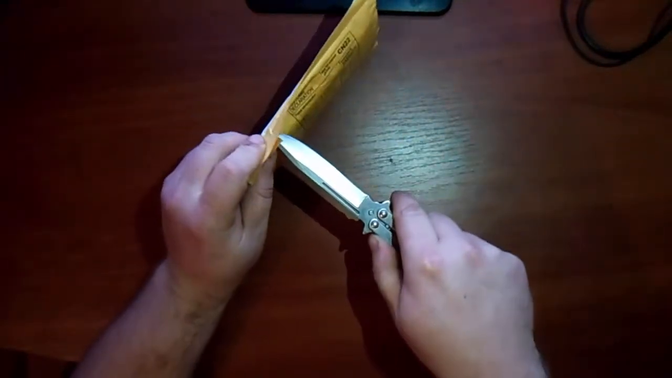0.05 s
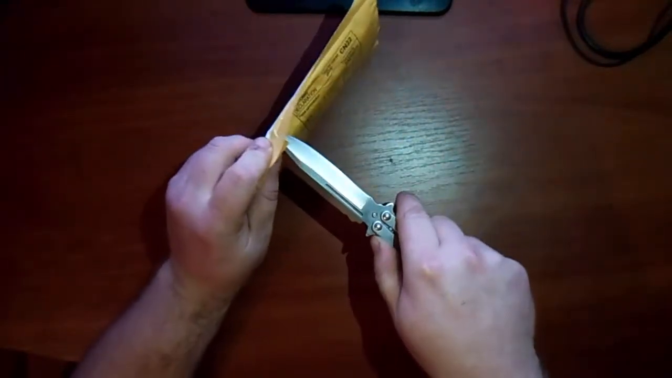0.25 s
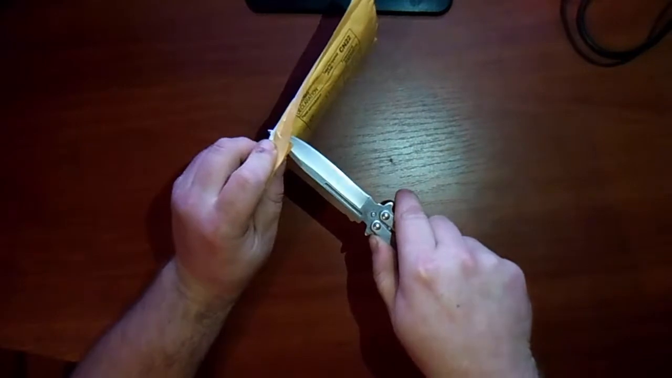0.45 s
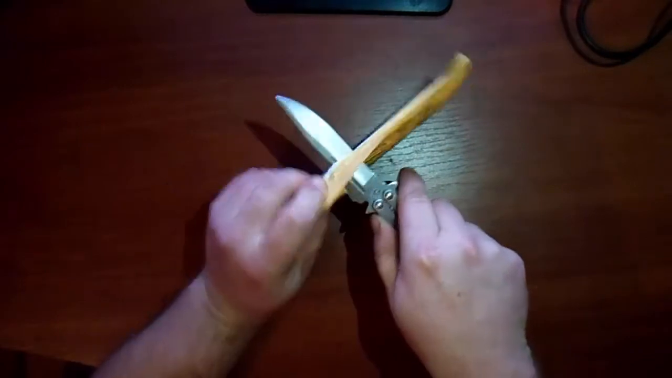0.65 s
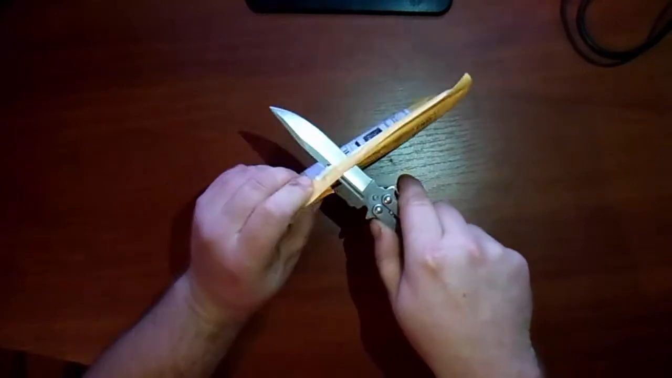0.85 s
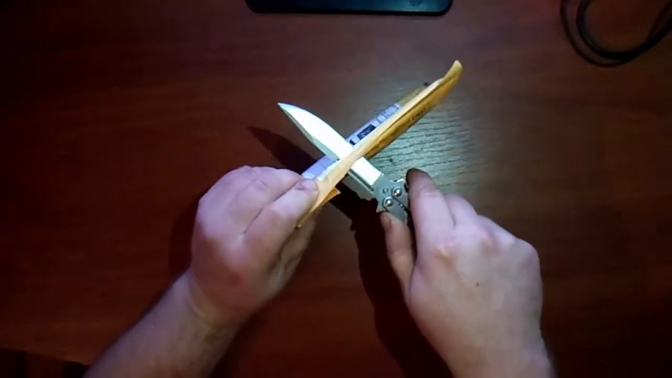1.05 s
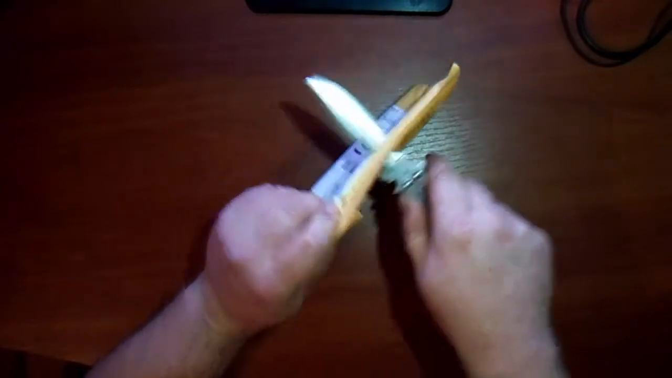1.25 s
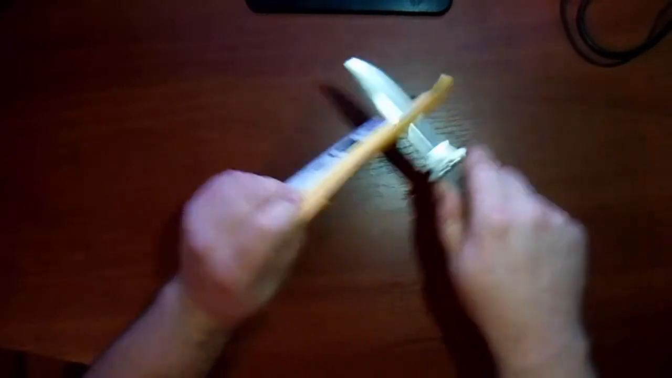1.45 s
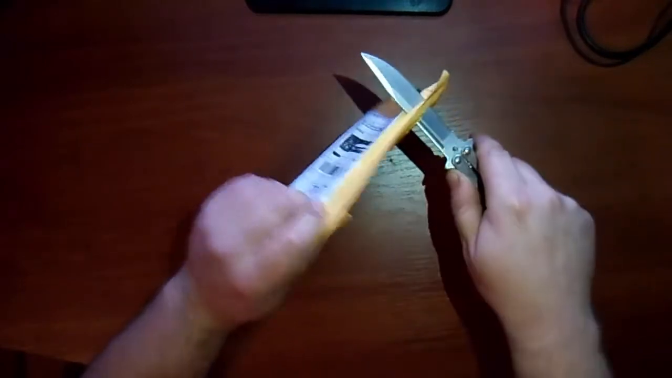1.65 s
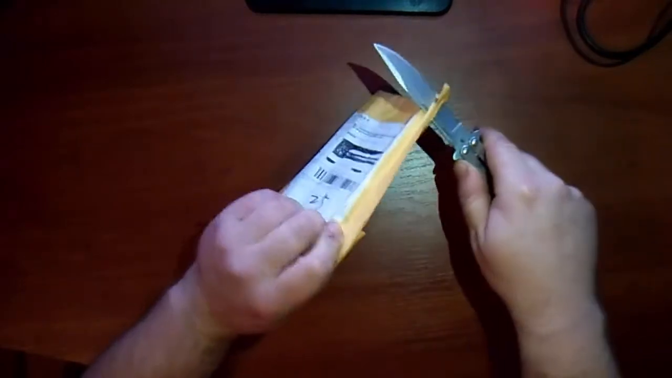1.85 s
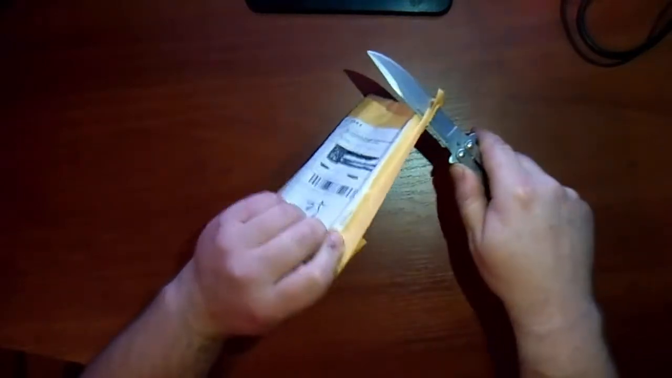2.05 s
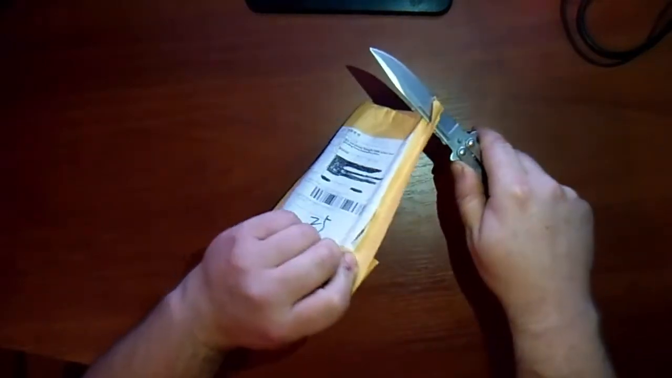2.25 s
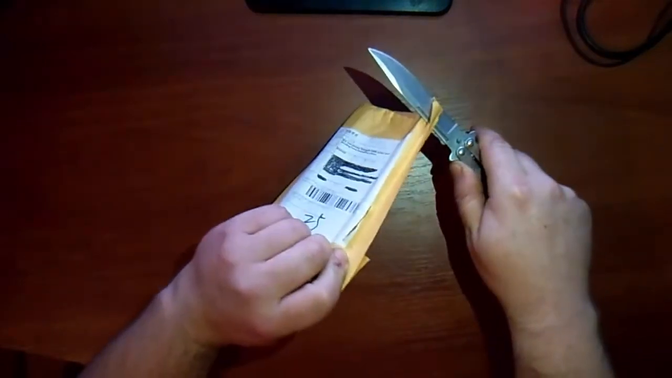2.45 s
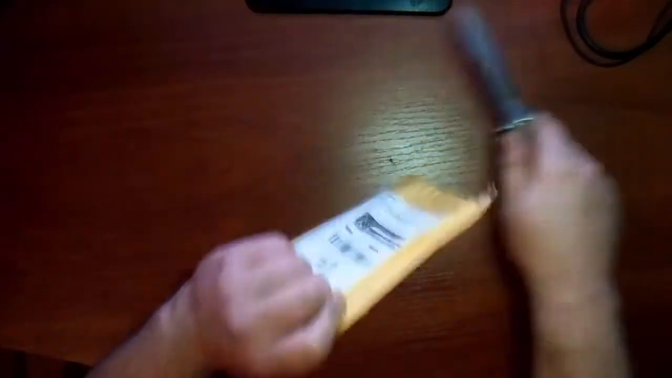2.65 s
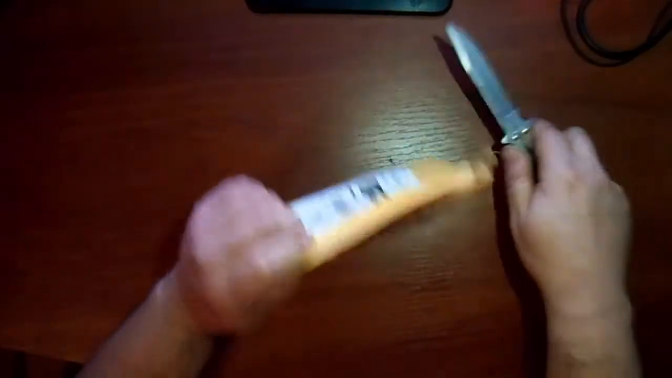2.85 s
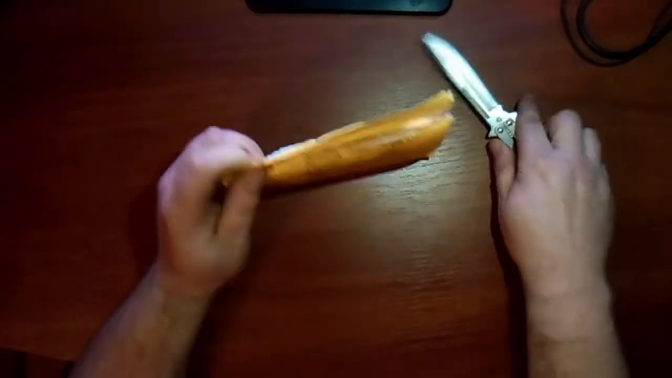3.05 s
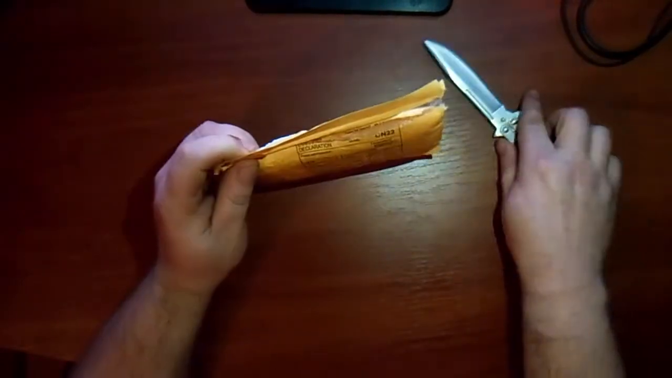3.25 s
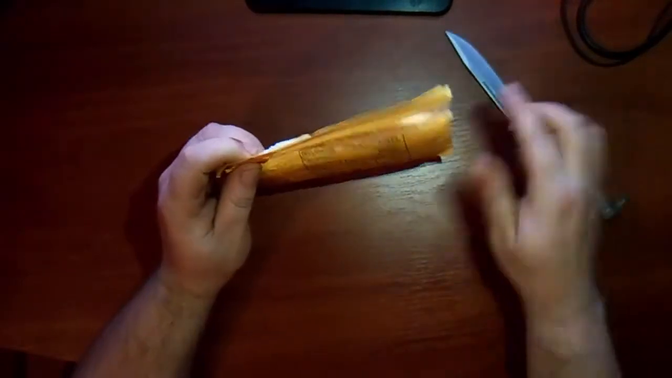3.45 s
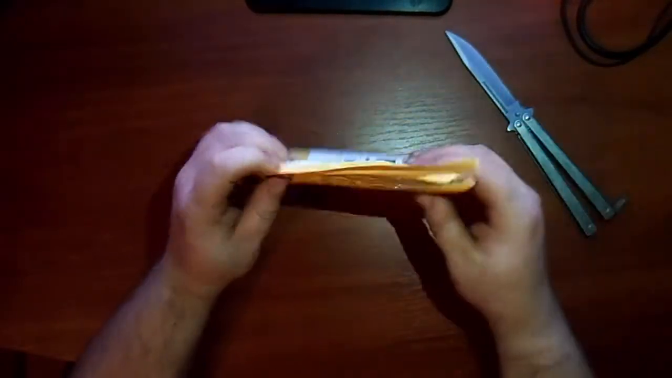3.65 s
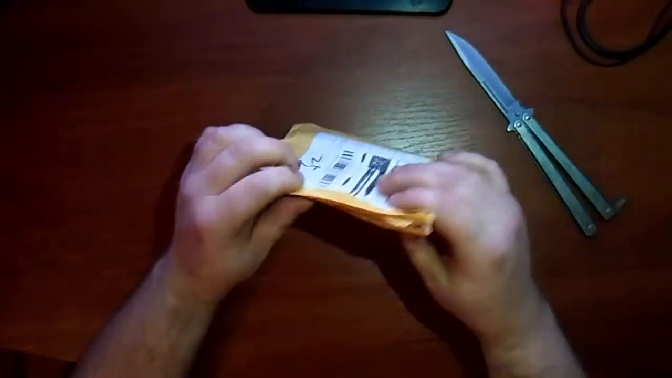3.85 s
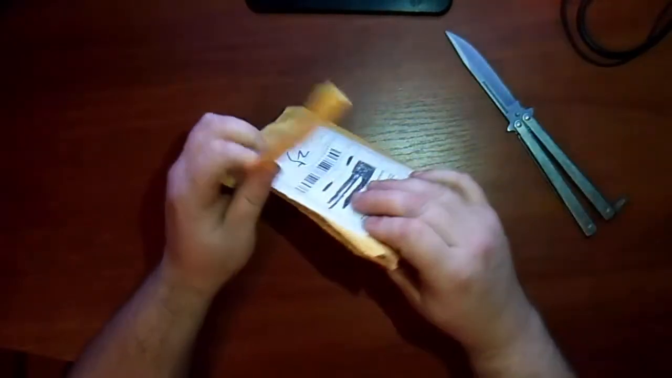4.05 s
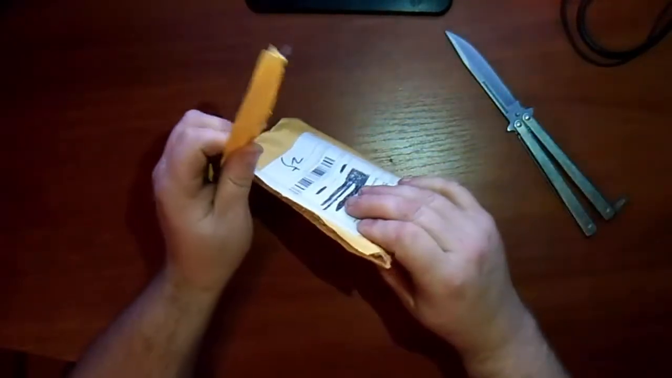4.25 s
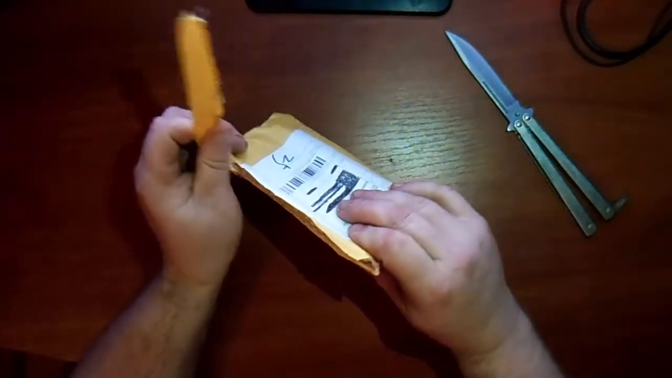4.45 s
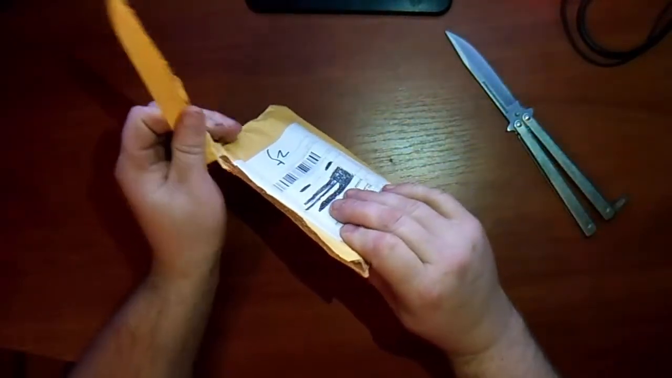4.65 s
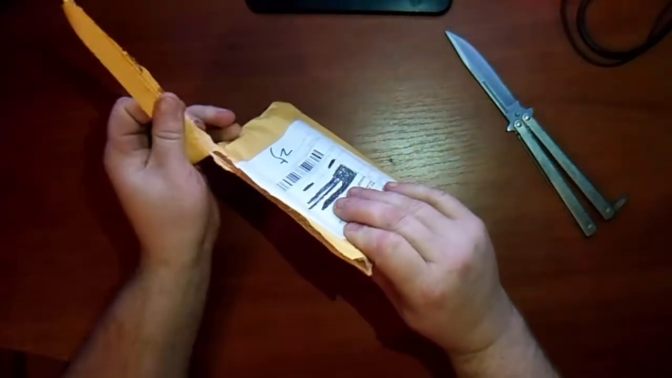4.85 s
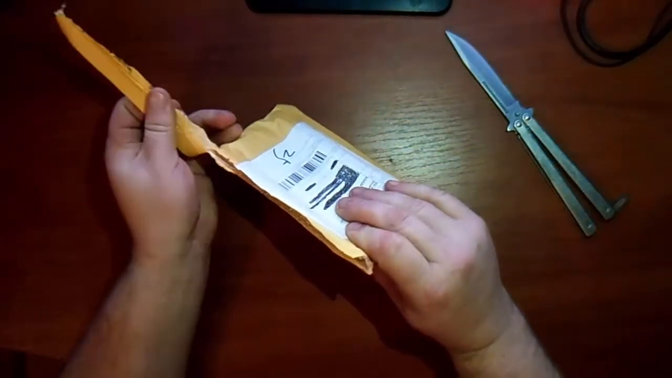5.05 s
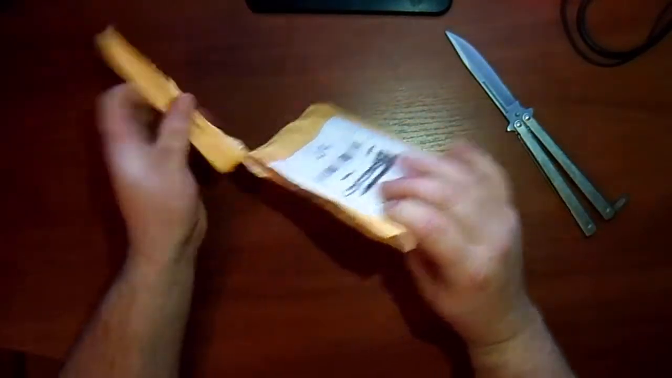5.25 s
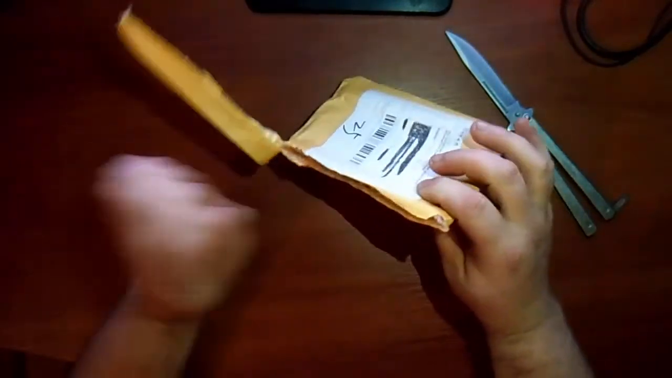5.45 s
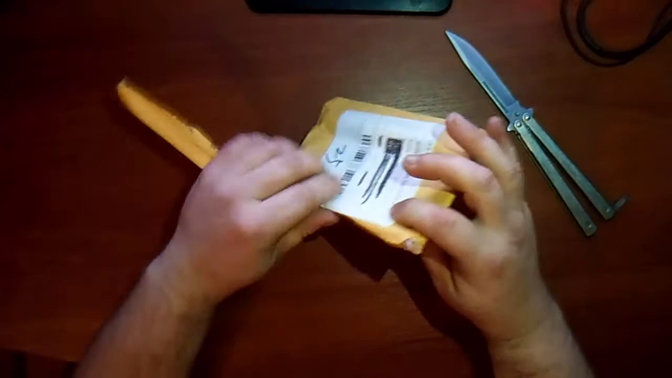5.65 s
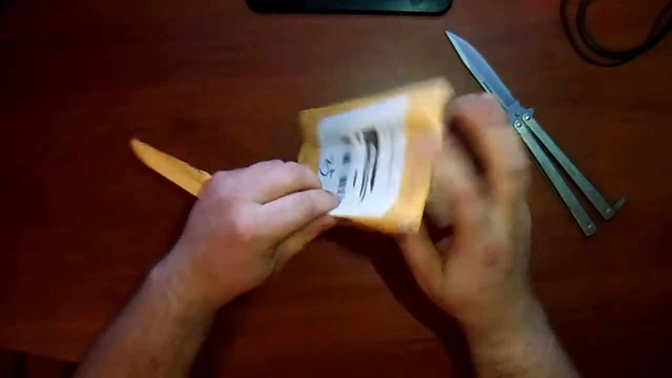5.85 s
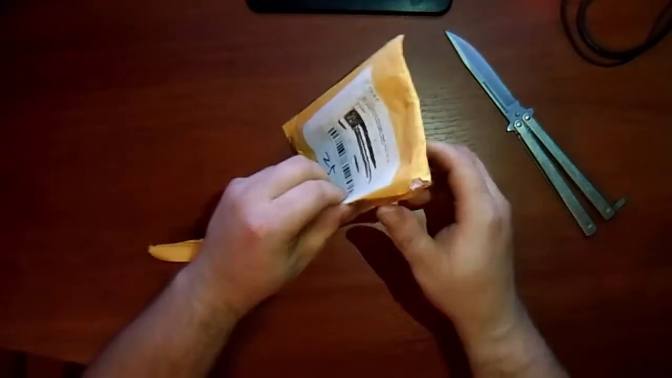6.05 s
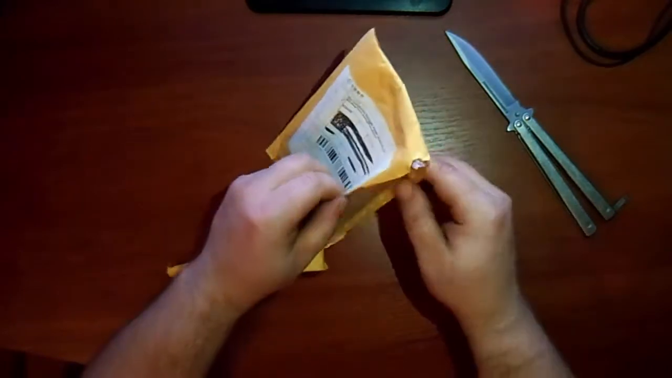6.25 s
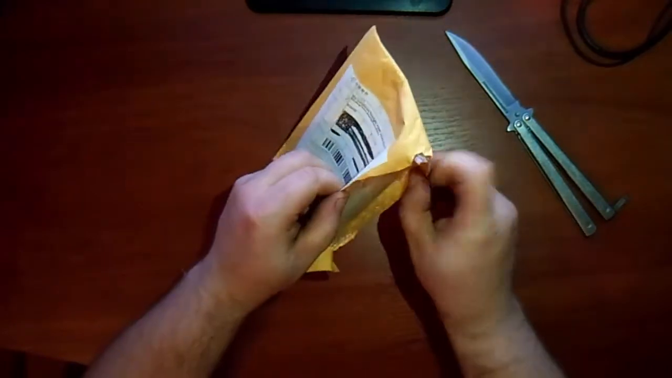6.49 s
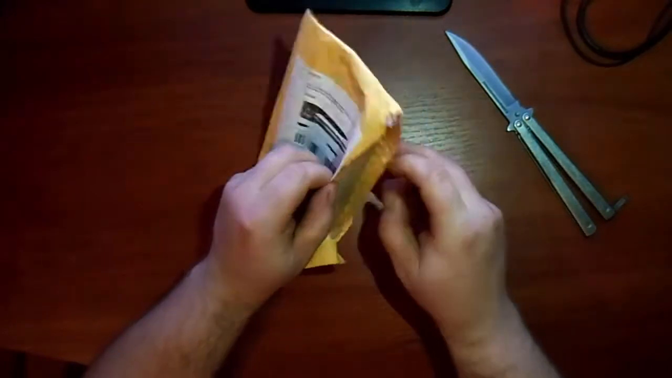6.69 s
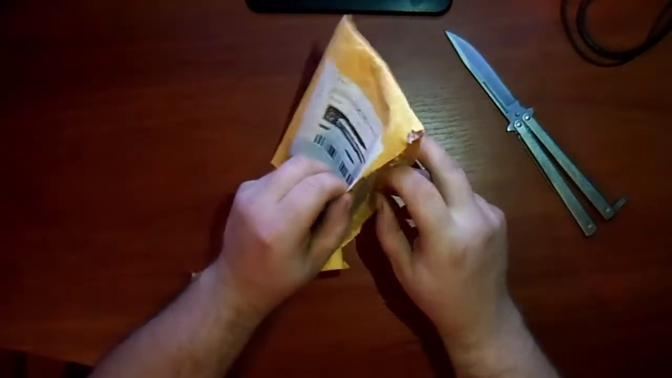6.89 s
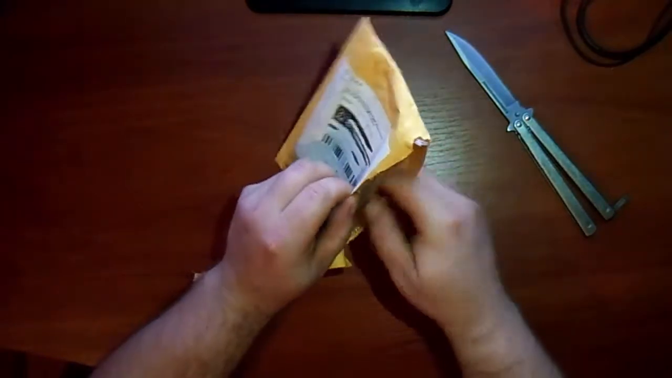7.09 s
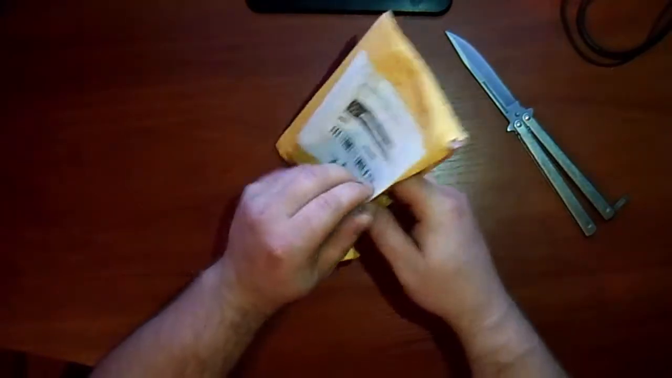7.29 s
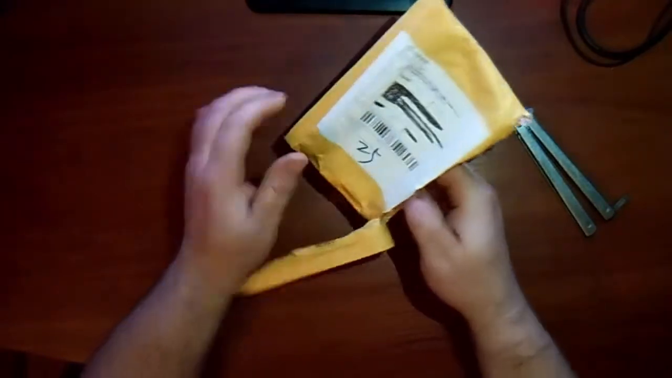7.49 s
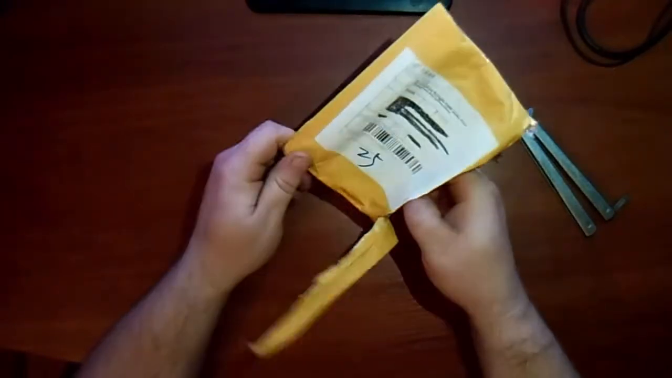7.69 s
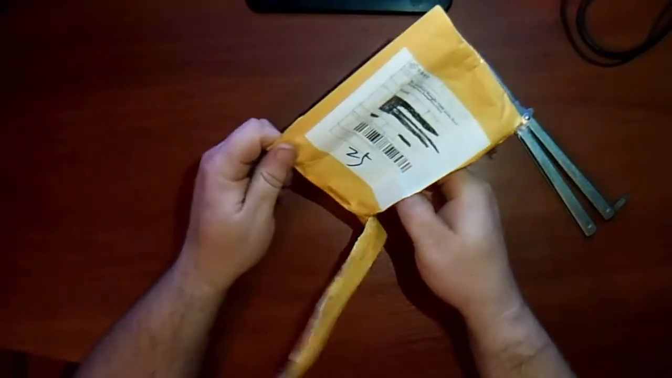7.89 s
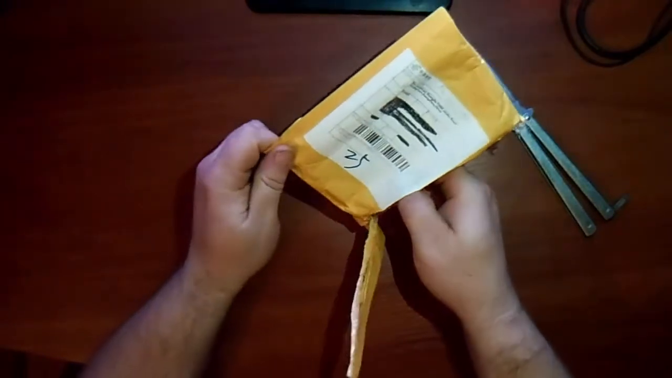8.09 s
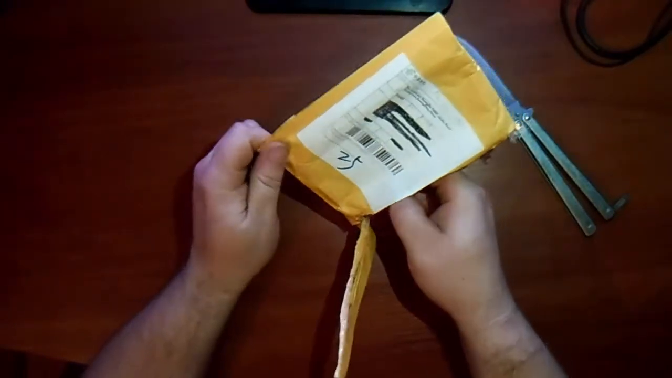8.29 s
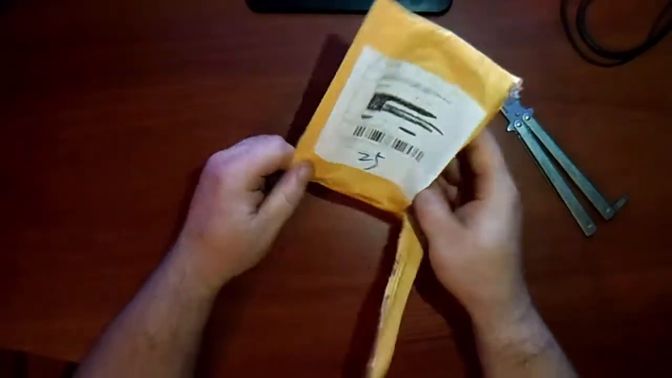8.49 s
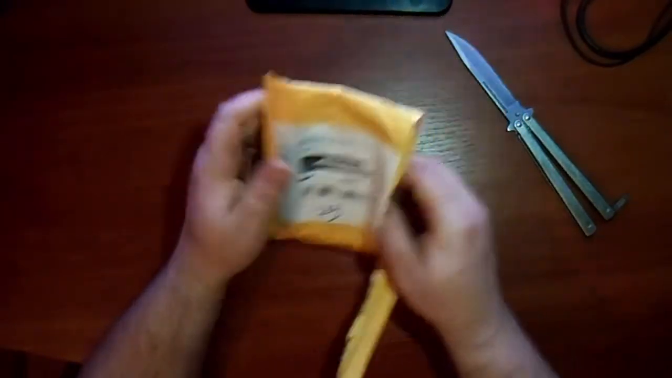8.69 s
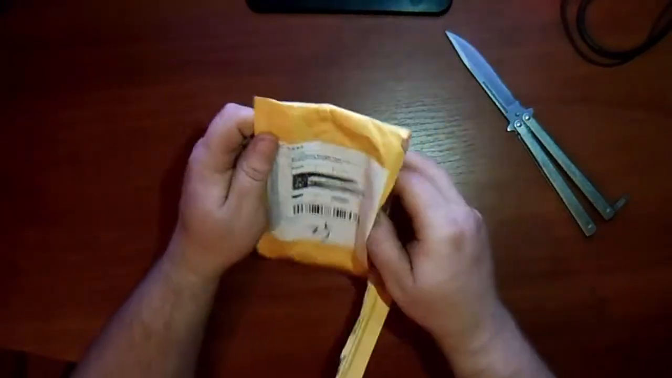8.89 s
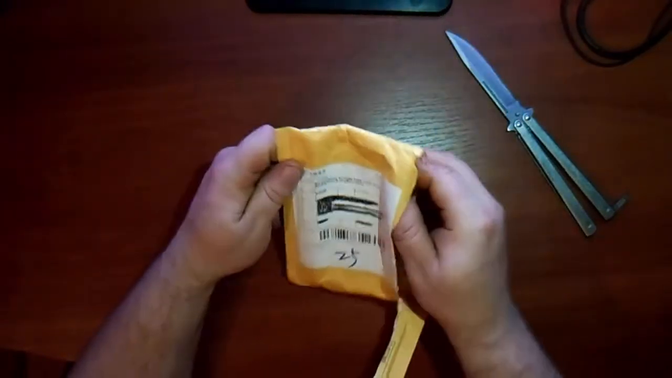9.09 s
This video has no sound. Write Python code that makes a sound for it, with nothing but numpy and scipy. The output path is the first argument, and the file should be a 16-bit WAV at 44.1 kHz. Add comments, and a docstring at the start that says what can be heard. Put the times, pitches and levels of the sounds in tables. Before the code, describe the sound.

Harsh bursts of cutting paper with bright snaps, a quick metal clatter on wood, then softer tearing and crisp envelope rustling in a quiet room.

```python
"""Knife strokes slit a padded paper envelope in jerks on a wooden desk: fibres crackle as noise bursts,
creases snap as short ringing panels and the desk rumbles. The knife is then laid down with a clatter of
steel bursts and desk resonances. Hands next peel the strip off, slide along a label and crinkle the
envelope. Throughout, a small room answers with decaying noise, over soft air noise and a faint fan hum."""
import sys
import numpy as np
from scipy import signal
from scipy.fft import rfft, irfft, next_fast_len
from scipy.io import wavfile
from scipy.ndimage import uniform_filter1d, map_coordinates

SR = 44100
rng = np.random.default_rng(int(sys.argv[2]) if len(sys.argv) > 2 else 0)


def master(y):
    """Save y as 16-bit WAV."""
    cut = np.clip(np.atleast_2d(y).T, -1, 1)
    pcm = np.round(cut * 32767)  # scale
    wavfile.write(sys.argv[1], SR, pcm.astype(np.int16))


N = 402633

# All levels are relative unless stated; each source applies its own gains to them.
# Knife strokes through the paper:
# (start [s], rise [s], hold [s], crackle level [dB], flexing relative to crackle [dB])
CUT_STROKES = [(0.269, 0.015, 0.0089, -33, -15), (0.498, 0.043, 0.075, -21, -14.5),
               (0.809, 0.0088, 0.18, -43, -9), (0.974, 0.024, 0.0059, -34.5, -15.5),
               (1.039, .02, 0.027, -47, -9), (1.111, 0.026, 0.055, -43.5, -9),
               (1.202, 0.02, 0.0033, -16, -8.5), (1.243, .014, 0.0092, -21, -13.5),
               (1.276, 0.012, 0.0034, -22, -7.5), (1.381, 0.028, .018, -24.5, -9.5),
               (1.432, 0.011, 0.034, -20, -13.5), (1.495, 0.0088, 0.0065, -40, -13),
               (1.599, 0.033, 0.13, -42, -9), (1.78, 0.02, 0.0044, -17, -15),
               (2.007, 0.031, 0.0072, -46, -8), (2.179, 0.013, 0.033, -27, -12),
               (2.485, 0.066, .005, -31, -20), (2.589, 0.014, 0.0024, -19.5, -7),
               (2.619, 0.011, 0.0041, -32, -5), (2.746, 0.018, 0.012, -54.5, -6),
               (2.915, 0.016, 0.023, -57.5, -0.5)]
CUT_FALL_DB_PER_S, CUT_TREBLE_DB = 481, -6.5  # treble is relative to the crackle
# Paper rustle: first the faint background under the cutting, then the handling, in several curves:
# (time [s], crackle level [dB])
RUSTLE_CURVES = [
    [(0, -61.5), (.25, -65.5), (.5, -60), (.76, -62.5), (1.35, -47), (1.56, -56.5), (1.92, -55),
     (2.15, -48.5), (2.42, -60), (2.75, -58.5), (2.9, -70.5), (3.6, -72)],
    [(3.61, -61), (3.626, -44.5), (3.765, -61), (3.902, -41.5), (3.952, -50), (4.06, -48.5), (4.128, -59)],
    [(4.128, -61), (4.183, -49), (4.31, -33.5), (4.4, -47.5), (4.472, -39), (4.54, -48), (4.58, -39.5),
     (4.735, -41.5), (4.79, -34), (4.864, -55.5), (4.907, -42.5), (5.08, -48), (5.111, -59)],
    [(5.111, -69), (5.174, -41.5), (5.34, -58.5), (5.416, -69.5), (5.61, -72.5)],
    [(5.61, -82), (5.625, -52.5), (5.788, -45), (5.94, -47), (5.978, -39), (6.073, -54)],
    [(6.073, -58), (6.167, -44), (6.337, -45), (6.4, -39.5), (6.49, -55), (6.535, -42.5), (6.61, -51),
     (6.64, -40), (6.738, -56.5), (6.786, -48), (6.94, -54.5)],
    [(6.94, -53), (7.04, -42.5), (7.128, -41), (7.186, -56.5), (7.26, -42), (7.35, -62)],
    [(7.35, -56.5), (7.61, -49.5), (7.955, -50.5), (8.11, -53), (8.158, -58), (8.21, -51.5), (8.277, -72)],
    [(8.277, -67), (8.33, -50), (8.483, -48.5), (8.538, -41.5), (8.56, -48.5), (8.674, -46.5),
     (8.78, -49.5), (8.95, -36.5), (9.016, -46.5), (9.13, -47)],
]
# Tone of each rustle curve, relative to its crackle: (flexing [dB], treble [dB])
RUSTLE_TONES = [(-12.5, -6), (-12, -6.5), (-13, -7), (-17, -7.5), (-15, -6), (-11.5, -6), (-8.5, -5),
                (-16, -6), (-10.5, -6.5)]
# Spectrum of breaking fibres: (frequency [Hz], level [dB])
CRACKLE_SPECTRUM = [(900, -45), (1600, -7.5), (2300, -1), (3800, -0.5), (6300, 1), (8000, 0.5),
                    (10000, -26.5)]
# Spectrum of the finest fibre sound: (frequency [Hz], level [dB])
TREBLE_SPECTRUM = [(6500, -23.5), (8000, 2), (10000, -3.5), (13000, -13), (16000, -19.5)]
# Spectrum of the flexing sheet: (frequency [Hz], level [dB])
FLEX_SPECTRUM = [(200, -30), (500, -2), (1000, -3), (1800, 2), (3000, -19)]
DENSE_DB = -29.5  # crackle level above which the fibres tear too thickly to be told apart

# Timed snaps of creases and fibres: (time [s], level [dB], panel pitch [Hz])
TIMED_SNAPS = [(.062, -31, 4940), (0.0845, -37, 3620), (.142, -38.5, 4970), (0.2048, -34, 5030),
               (.2793, -17.5, 4830), (0.2951, -14, 4470), (0.3723, -33.5, 5300), (.42, -37.5, 4440),
               (.48, -35, 6000), (0.498, -27.5, 4890), (0.5098, -26, 3760), (0.5724, -6.5, 6140),
               (0.594, -0.5, 3670), (.678, -23, 6000), (0.7775, -19.5, 2770), (0.8208, -10, 4370),
               (0.9944, -18, 4730), (1.216, -7.5, 2600), (1.226, 2.5, 4200), (1.265, -8.5, 6280),
               (1.287, -10, 2740), (1.2915, -3.5, 5500), (1.408, -15, 3510), (1.3946, -19.5, 2000),
               (1.446, -12.5, 4940), (1.482, -15.5, 4670), (1.514, -17, 4850), (1.794, -6, 2900),
               (1.8355, -10.5, 6500), (2.132, -24, 6900), (2.189, -13.5, 2600), (2.1961, -9, 5200),
               (2.381, -26.5, 5470), (2.5336, -23, 5200), (2.5538, -16, 2850), (2.607, -8, 2580),
               (2.965, -40, 4500), (3.027, -40.5, 3900), (3.622, -33, 5320), (3.648, -27, 5440),
               (3.8588, -28, 4330), (3.897, -23, 5250), (4.012, -26.5, 2600), (4.048, -28, 5600),
               (4.064, -24, 2240), (4.1443, -31.5, 2200), (4.1786, -29.5, 2620), (4.3147, -19, 6900),
               (4.3383, -3.5, 6740), (4.761, -15.5, 6260), (4.9, -27.5, 6680), (4.9858, -17.5, 6850),
               (5.1409, -24, 3640), (5.17, -25, 3840), (5.2143, -27.5, 2880), (5.349, -29.5, 5400),
               (5.388, -34.5, 6710), (5.4038, -36.5, 3680), (5.447, -39, 3670), (5.58, -43, 4000),
               (5.6227, -27, 5250), (6.045, -22, 7240), (6.2304, -16, 6600), (6.394, -14.5, 3100),
               (6.529, -15, 1520), (6.635, -23, 1690), (6.7194, -26, 6100), (6.8903, -28, 4590),
               (7.1222, -23, 5560), (7.208, -24, 6400), (7.2365, -21.5, 6910), (7.319, -24.5, 3530),
               (7.37, -29.5, 2560), (7.4843, -38, 2720), (7.6054, -25, 6200), (7.7296, -34, 2070),
               (7.8843, -26.5, 6140), (7.9095, -25.5, 6090), (8.055, -26.5, 4600), (8.378, -26, 3130),
               (8.521, -27, 1300), (8.538, -25, 1240), (8.5721, -16, 2440), (8.5718, -22.5, 1100),
               (8.657, -26, 3500), (8.92, -31.5, 1410), (8.9666, -7.5, 1850), (8.975, -20.5, 990),
               (9.056, -27, 3660)]
# Spectrum of the low body of a snap: (frequency [Hz], level [dB])
SNAP_BODY_SPECTRUM = [(500, -42.5), (900, 3), (1300, 1.5), (1900, 6), (3000, -18.5)]
SNAP_T60_S = 0.011
BODY_DB, BODY_DB_PER_OCTAVE = -4.5, -8.5  # body of a 1 kHz panel; smaller, higher panels have less
RANDOM_SNAPS = 50  # more snaps at random times
RANDOM_SNAP_DB, RANDOM_SNAP_SPREAD_DB = 15, 2  # above the crackle, and plus or minus

# Resonances of the strip as it peels off: (frequency [Hz], width [Hz], level [dB])
STRIP_MODES = [(2250, 500, -3.5), (6460, 1000, -1), (9800, 1000, -4)]
STRIP_DB, PEEL_CURVE = -5, 2  # level over the crackle; index of the rustle curve that peels

# Fingers slide along the glossy label: (start [s], rise [s], hold [s], level [dB])
LABEL_RUBS = [(5.833, 0.025, 0.11, -44.5), (6.12, 0.027, 0.041, -41)]
# Resonances of the label: (frequency [Hz], width [Hz], level [dB])
LABEL_MODES = [(4170, 500, -1.5), (5940, 700, -4), (9400, 900, -10.5), (11800, 530, -10)]
RUB_FALL_DB_PER_S = 900

# Knife handles meet the desk: (time [s], steel clack [dB], low knock [dB], hard knock [dB])
KNIFE_CONTACTS = [(3.176, -14.5, -30.5, -25), (3.206, -22, -20, -13), (3.285, -6, -19, -22.5),
                  (3.294, 1, -22, -27.5), (3.301, -7, -18, -20), (3.313, -13, -12.5, -21),
                  (3.315, -18.5, -15, -23), (3.324, -7, -20.5, -12), (3.329, -13, -22, -27)]
# Spectrum of the steel clack: (frequency [Hz], level [dB])
CLACK_SPECTRUM = [(300, -2.5), (1500, -12), (4000, 4.5), (7000, -5.5), (12000, -8), (16000, -16)]
# Resonances of the desk: (frequency [Hz], width [Hz], level [dB])
DESK_MODES = [(116, 33, -0.5), (200, 70, -2), (260, 35, -2.5), (384, 35, -3.5), (317, 67, -7),
              (498, 64, 0.5), (603, 90, -8), (744, 47, -10), (1086, 68, -6.5), (1420, 60, -11),
              (1710, 80, -15), (2140, 79, -9.5), (2550, 80, -13.5)]
# Spectrum of the dense small modes of the desk: (frequency [Hz], level [dB])
BOARD_SPECTRUM = [(300, -18), (700, -2), (1200, -5), (1700, -3.5), (3000, -7.5), (5000, -21.5)]

# The pull of the knife shakes the desk through the forearms:
# (start [s], rise [s], hold [s], level [dB])
DESK_JOLTS = [(.53, 0.053, 0.057, -34), (0.754, 0.026, .005, -41.5), (1.188, 0.093, 0.05, -38),
              (1.396, 0.084, 0.012, -38.5), (1.775, 0.029, 0.031, -43.5), (2.2, .07, .01, -59),
              (2.573, 0.11, .015, -42.5)]
# Spectrum of the shaken wood: (frequency [Hz], level [dB])
WOOD_SPECTRUM = [(20, -22.5), (55, -3), (110, 2), (200, -19), (350, -13), (650, -8), (1000, -24.5)]
JOLT_FALL_DB_PER_S = 352

# Reverberation of the room: (frequency [Hz], time to fall 60 dB [s])
ROOM_T60 = [(150, 0.42), (1000, 0.43), (4000, 0.21), (12000, 0.17)]
# Dip of the microphone housing: (centre [Hz], width [Hz], gain [dB])
HOUSING_DIP = (7980, 535, -8.5)
# Spectrum of the room air: (frequency [Hz], relative density [dB])
AIR_SPECTRUM = [(12, -21.5), (20, -0.5), (93, -13), (134, -14.5), (158, -20), (310, -24.5), (558, -22.5),
                (607, -24.5), (660, -24.5), (1290, -32), (16000, -58)]
# Left-right part of the air, relative to the air: (frequency [Hz], level [dB])
SIDE_AIR_SPECTRUM = [(20, -1.5), (110, -17.5), (700, -12), (1300, -43.5), (16000, -51.5)]
# Fan hum: (frequency [Hz], width [Hz], level [dB])
FAN_HUM = [(80, 4.4, -74.5), (130, 6.8, -76), (299, 78, -71.5), (438.5, 35, -71.5), (605.6, 30, -75.5),
           (708.5, 33, -79.5)]
AIR_DB = -63.5
CEILING, TOP_HZ, EDGE_HZ = .95, 15900, 16600


def effort():
    """Superposition: gains of the crackle, flexing and treble, cuts added to the rustle."""
    parts = [(stroke(*row[:4], CUT_FALL_DB_PER_S), row[4], CUT_TREBLE_DB) for row in CUT_STROKES]
    for rows, shares in zip(RUSTLE_CURVES, RUSTLE_TONES):
        parts.append((amp(curves(rows, outside=-120)[0]), *shares))
    gain, flex_db, treble_db = zip(*parts)
    return amp([np.zeros(len(parts)), flex_db, treble_db]) @ np.array(gain)


def paper(level, flex, treble):
    """Fracture and bending: crisp crackle of breaking fibres over a duller flexing of the sheet."""
    rasp = patches(crackle(per_s=1500, spread_db=3.0, t60=0.026), depth_db=2.0, slow_db=2.5)
    creases = .6 * crackle(per_s=90, spread_db=3, t60=.016)
    sparse = rasp + creases + .22 * ticks(count=2500, cycles=22, spread_db=3)
    thick = 1.26 * patches(crackle(per_s=5500, spread_db=2.5, t60=0.008), depth_db=3, slow_db=1.5)
    # a power crossfade: louder tearing is denser
    dense = level ** 2 / (level ** 2 + amp(DENSE_DB) ** 2)
    fibres = np.sqrt(1 - dense) * sparse + np.sqrt(dense) * thick
    sheet = 0.47 * fibres + crackle(per_s=690, spread_db=2.5, t60=0.03)

    crisp = filtered(amp(-2.5) * level * fibres, colour(CRACKLE_SPECTRUM))
    fine = filtered(treble * amp(1.5 * wobble(9.7)) * fibres, colour(TREBLE_SPECTRUM))
    flexing = filtered(amp(-5.0 + 2.2 * wobble(13)) * flex * sheet, colour(FLEX_SPECTRUM))
    return crisp + fine + flexing


def snaps(level):
    """Impulsive excitation: each snap is a sharp burst that rings a small paper panel briefly."""
    crisp, low, panel = np.zeros((3, N + SR))
    t = np.arange(SR // 20) / SR
    for s, db, hz in TIMED_SNAPS + random_snaps(level):
        body_db = BODY_DB + BODY_DB_PER_OCTAVE * np.log2(hz / 1000)
        at = round(s * SR)
        here = slice(at, at + len(t))
        noise = rng.standard_normal((3, len(t)))
        noise /= np.sqrt(np.mean(noise[:, :40] ** 2, axis=1, keepdims=True))  # even onsets
        fall = amp(-60 * t / SNAP_T60_S) + .1 * amp(-60 * t / .06)
        crisp[here] += amp(db - 12) * noise[0] * fall
        low[here] += amp(db + body_db - 9.5) * noise[1] * amp(-60 * t / 0.03)
        rough = 1 + 0.77 * unit(uniform_filter1d(noise[2], size=30))  # a creased panel rings unevenly
        decay = amp(db - 6 - 60 * t * hz / 15)  # 60 dB in 15 cycles
        panel[here] += decay * rough * (1 - np.exp(-2 * t * hz)) * np.sin(2 * np.pi * hz * t)

    def bright(hz):
        """Sum of the crackle and treble responses."""
        return colour(CRACKLE_SPECTRUM)(hz) + 0.78 * colour(TREBLE_SPECTRUM)(hz)

    def high_pass(hz):
        """Second-order high-pass response near 800 Hz."""
        return hz ** 2 / (hz ** 2 - 800 ** 2 - 1200j * hz)

    body = filtered(low[:N], colour(SNAP_BODY_SPECTRUM))
    return filtered(crisp[:N], bright) + body + filtered(panel[:N], high_pass)


def random_snaps(level):
    """Random events: more snaps at random times, with levels following the crackle."""
    draw = rng.random((RANDOM_SNAPS, 3))
    s = draw[:, 0] * (N - 1) / SR
    crackle_db = 20 * np.log10(level[(s * SR).astype(int)])
    db = crackle_db + RANDOM_SNAP_DB + RANDOM_SNAP_SPREAD_DB * (2 * draw[:, 1] - 1)
    return list(zip(s, db, 2000 * 3.5 ** draw[:, 2]))


def peel():
    """Forced resonance: the taut strip rings in a few broad bands while it is pulled away."""
    fibres = filtered(crackle(per_s=870, spread_db=4, t60=0.0069), lambda f: modes(f, STRIP_MODES))
    return amp(curves(RUSTLE_CURVES[PEEL_CURVE], outside=-120)[0] + STRIP_DB) * unit(fibres)


def rub():
    """Sliding friction: a dense hiss excites the label's resonances."""
    hiss = filtered(crackle(per_s=4400, spread_db=3.0, t60=0.0052), lambda f: modes(f, LABEL_MODES))
    return sum(stroke(*row, RUB_FALL_DB_PER_S) for row in LABEL_RUBS) * unit(hiss)


def knife():
    """Impact: loose steel handles clack, and each rough contact knocks the desk top."""
    clacks, knocks, hard = np.zeros((3, N))
    for s, db, knock_db, hard_db in KNIFE_CONTACTS:
        at = round(s * SR)
        clacks[at], knocks[at], hard[at] = amp(db - 8.5), amp(knock_db), amp(hard_db - 4.5)
    click = bursts(clacks, t60=.014)
    steel = filtered(click + 0.28 * bursts(clacks, t60=0.069), colour(CLACK_SPECTRUM))
    # a push, then chatter
    blow = 3.7 * knocks + 0.69 * bursts(knocks, t60=0.011) + 0.15 * bursts(knocks, t60=0.14)
    desk = 9.6 * filtered(blow, lambda f: modes(f, DESK_MODES))
    board = bursts(hard, t60=0.042) + 0.21 * bursts(hard, t60=0.21)
    return steel + desk + filtered(board, colour(BOARD_SPECTRUM))


def shake():
    """Structure-borne sound: filtered noise gives a low wooden rumble under the hard strokes."""
    level = sum(stroke(*row, JOLT_FALL_DB_PER_S) for row in DESK_JOLTS)
    return level * filtered(rng.standard_normal(N), colour(WOOD_SPECTRUM)) * 0.74


def room(x):
    """Reverberation: each frequency dies at its own speed, and each stretch gets its own noise tail."""
    out, step = np.zeros(N + SR), SR // 3
    for a in range(0, N, step):
        hz, t, z = signal.stft(rng.standard_normal(SR // 2), SR, nperseg=256)
        fall = amp(-60 * t / along(ROOM_T60, hz)[:, None])
        tail = signal.istft(z * fall, SR, nperseg=256)[1][:SR // 2]
        wet = signal.fftconvolve(x[a:a + step], tail / np.linalg.norm(tail))
        out[a:a + len(wet)] += wet
    return np.pad(out, (200, 0))[:N]  # delay in samples


def housing(hz):
    """Interference: the microphone's housing weakens a band of the desk sounds and their echo."""
    centre_hz, width_hz, gain_db = HOUSING_DIP
    return amp(gain_db * np.exp(-((hz - centre_hz) / width_hz) ** 2))


def air():
    """Stationary noise: room air and a wavering fan hum, nearly alike on both sides."""
    bed = amp(AIR_DB + 1.2 * wobble(5)) * filtered(rng.standard_normal(N), colour(AIR_SPECTRUM))
    for hz, width_hz, db in FAN_HUM:
        band = filtered(rng.standard_normal(N), lambda f: 1 / (1 + ((f - hz) / width_hz * 2) ** 2))
        bed += amp(db + 1.4 * wobble(2.4)) * unit(band)

    def side_response(f):
        """Air spectrum scaled by its left-right share."""
        return colour(AIR_SPECTRUM)(f) * amp(along(SIDE_AIR_SPECTRUM, f))

    side = amp(AIR_DB) * filtered(rng.standard_normal(N), side_response)
    return np.array([bed + side, bed - side])


def crackle(per_s, spread_db, t60):
    """Random fracture: many tiny fibres break in clumps, a few much louder than most."""
    draw = rng.random((2, N))
    size = amp(-spread_db * np.log(draw[1] + 0.0013) + 2.5 * wobble(70))
    x = bursts((draw[0] < per_s / SR) * size, t60)
    power = np.abs(uniform_filter1d(x ** 2, size=SR // 25))
    return x / np.sqrt(power + 1e-9)  # even out the level over 40 ms


def ticks(count, cycles, spread_db):
    """Free vibration: small creases flick at random, each ringing its own little panel."""
    draw, t = rng.random((count, 3)), np.arange(256) / SR
    hz = 1800 * 6 ** draw[:, 1:2]
    size = amp(-spread_db * np.log(draw[:, 2:] + 0.017))
    fall = amp(-60 * t * hz / cycles)
    ring = size * fall * np.sin(2 * np.pi * hz * t) * (1 - np.exp(-t * hz))
    at = (draw[:, :1] * N).astype(int) + np.arange(len(t))
    return unit(np.bincount(at.ravel(), ring.ravel(), N + len(t))[:N])


def patches(x, depth_db, slow_db):
    """Changing radiation: panels of the sheet sound in turn, shifting the colour quickly and slowly."""
    z = signal.stft(x, nperseg=128)[2]

    def drift(frames):
        """Random gain field smoothed over frequency and time."""
        over_hz = uniform_filter1d(rng.standard_normal(z.shape), size=3, axis=0)
        return unit(uniform_filter1d(over_hz, size=frames, axis=1))

    gain = unit(amp(depth_db * drift(16) + slow_db * drift(90)))
    return signal.istft(z * gain, nperseg=128)[1][:N]


def stroke(start, rise, hold, db, fall_db_per_s):
    """Envelope of one stroke: it climbs the last 30 dB in the rise time, holds, then falls steadily."""
    rise = max(rise, .002)
    top = start + rise
    end = top + max(hold, 0)
    points = [(top - 3 * rise, db - 90), (top, db), (end, db), (end + 90 / fall_db_per_s, db - 90)]
    level_db, = curves(points, outside=-np.inf)
    return np.exp(level_db * np.log(10) / 20)


def bursts(starts, t60):
    """Exponential decay: noise jumps up at every start and falls 60 dB in t60 seconds."""
    fall = amp(-60 / max(t60, 1e-4) / SR)
    return signal.lfilter([1], [1, -fall], starts) * rng.standard_normal(N)


def modes(f, table):
    """Modal sum: the response of (Hz, width Hz, dB) resonances with alternating signs."""
    total = 0
    for k, (c, w, db) in enumerate(table):
        total = total + (-1) ** k * amp(db) * 1j * f * w / (c * c - f * f + 1j * f * w)
    return total


def colour(points):
    """Minimum phase: a causal response from (Hz, dB) points, keeping white noise at its power."""
    def response(hz):
        """Fold the cepstrum onto positive times."""
        cep = irfft(np.log(unit(amp(along(points, hz))) + 1e-6))
        cep[1:len(hz) - 1] *= 2
        cep[len(hz):] = 0
        return np.exp(rfft(cep))
    return response


def filtered(x, response):
    """Linear filtering: the spectrum of x times a response of frequency."""
    m = next_fast_len(N + SR // 2)
    return irfft(rfft(x, m) * response(np.fft.rfftfreq(m, 1 / SR)), m)[..., :N]


def wobble(rate):
    """Slow random modulation: a smooth curve through rate random knots a second."""
    return map_coordinates(rng.standard_normal(int(N * rate / SR) + 4), [np.arange(N) * rate / SR])


def curves(rows, outside=None):
    """Linear interpolation: one value per sample for each column after the time."""
    s, *cols = np.transpose(rows)
    return [np.interp(np.arange(N) / SR, s, c, outside, outside) for c in cols]


def along(points, hz):
    """Logarithmic frequency: (Hz, value) points interpolated on a log axis."""
    f, v = np.transpose(points)
    return np.interp(np.log(hz + 1), np.log(f + 1), v)


def amp(db):
    """Decibel law: level to amplitude ratio."""
    return 10 ** (np.asarray(db) / 20)


def unit(x):
    """Normalisation to a root-mean-square value of one."""
    return x / np.sqrt(np.mean(x ** 2) + 1e-20)


def scene():
    """Superposition: everything on the desk, its echo and the air."""
    level, flex, treble = effort()
    near = paper(level, flex, treble) + snaps(level) + peel() + rub() + knife() + shake()
    near = filtered(near + amp(-13.0) * room(near), housing)
    # mainly low echoes differ left to right
    side = amp(-45.0) * filtered(room(near), lambda hz: 1 / (1 + (hz / 700) ** 4))
    return near + np.array([side, -side]) + air()


def record(dry):
    """Saturation and band limit: peaks are rounded, the top fades and nothing is kept above the edge."""
    dry = dry / (1 + np.abs(dry / CEILING) ** 6) ** (1 / 6)
    return filtered(dry, lambda hz: (hz < EDGE_HZ) / (1 + (hz / TOP_HZ) ** 90))


dry = scene()
out = record(dry)
master(out)
```